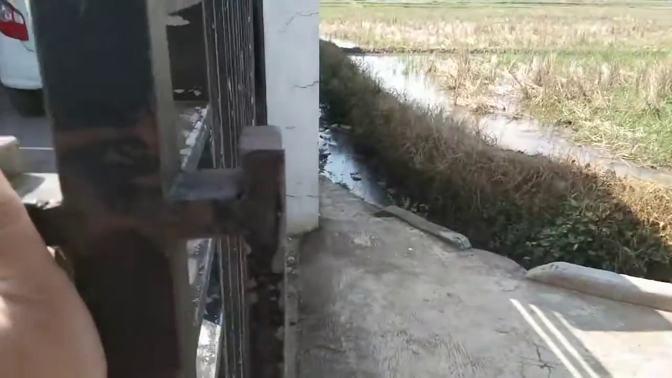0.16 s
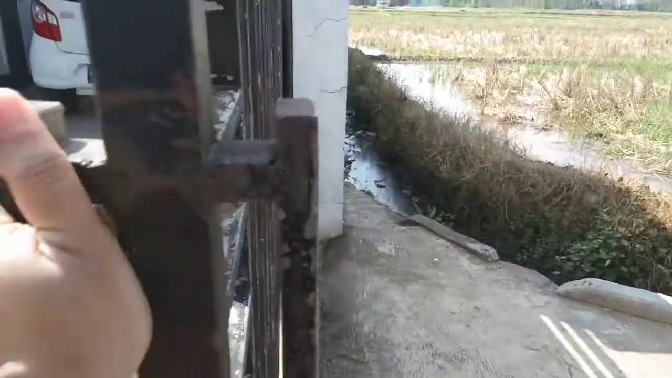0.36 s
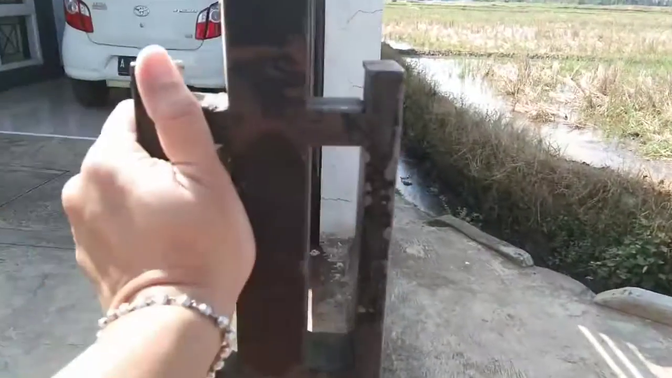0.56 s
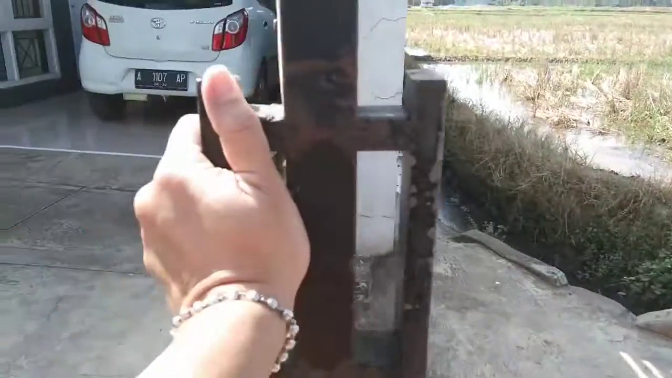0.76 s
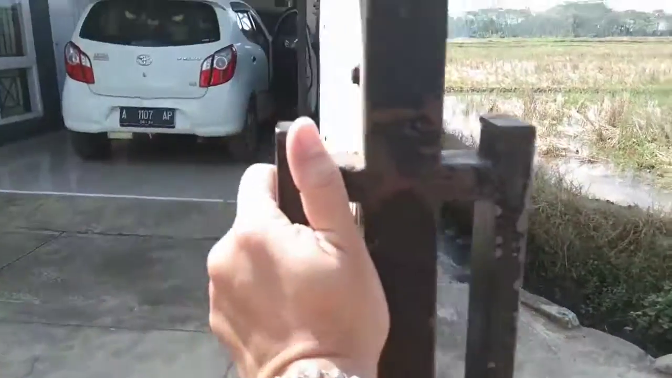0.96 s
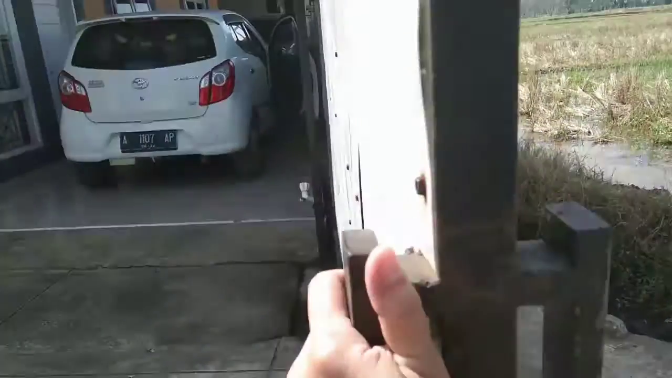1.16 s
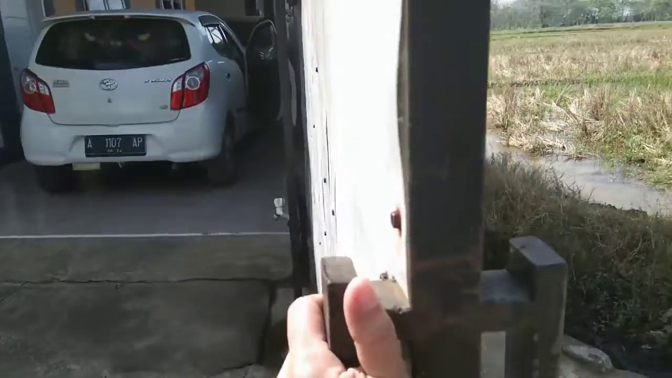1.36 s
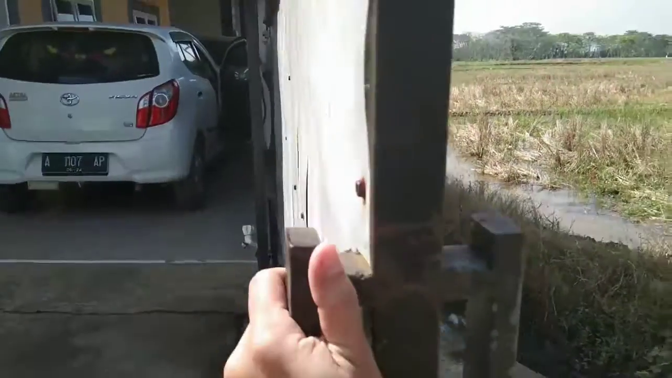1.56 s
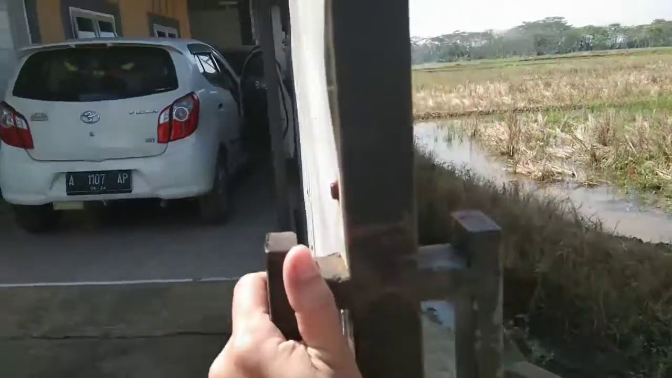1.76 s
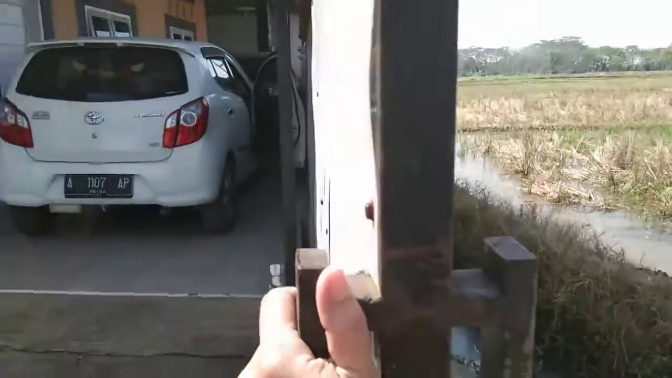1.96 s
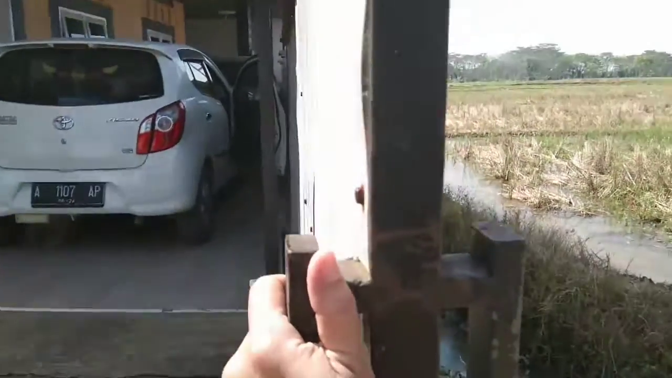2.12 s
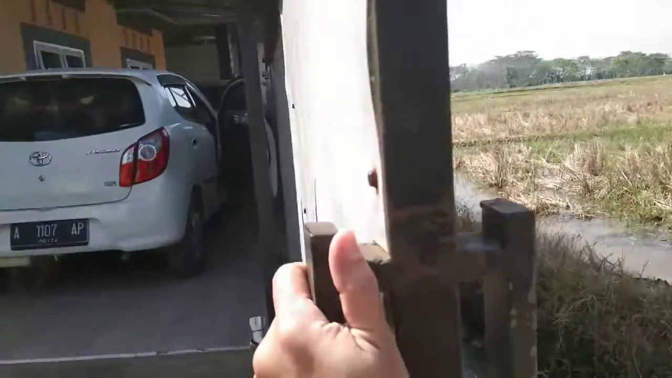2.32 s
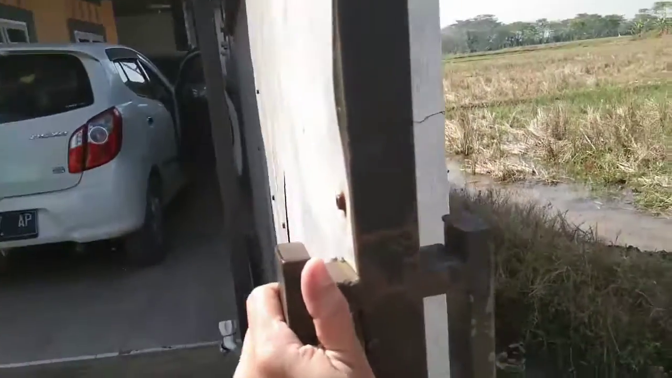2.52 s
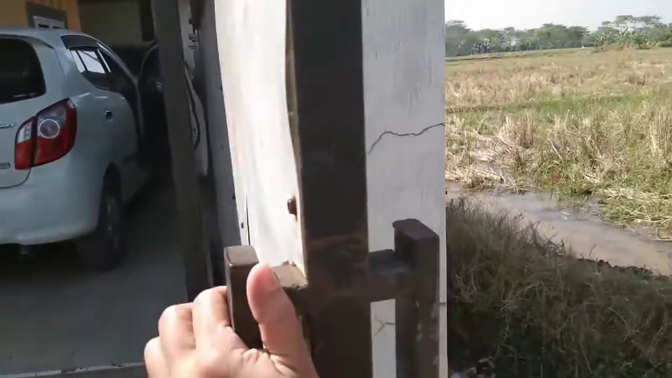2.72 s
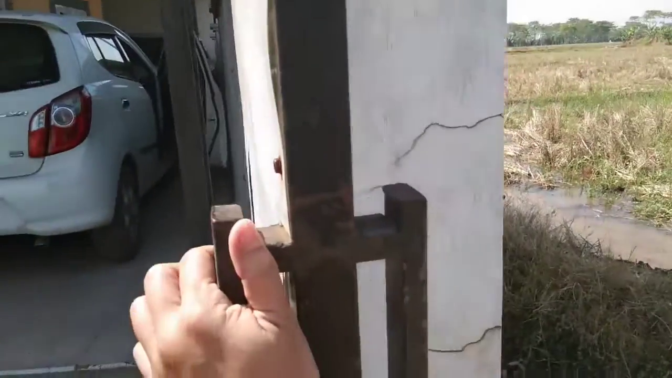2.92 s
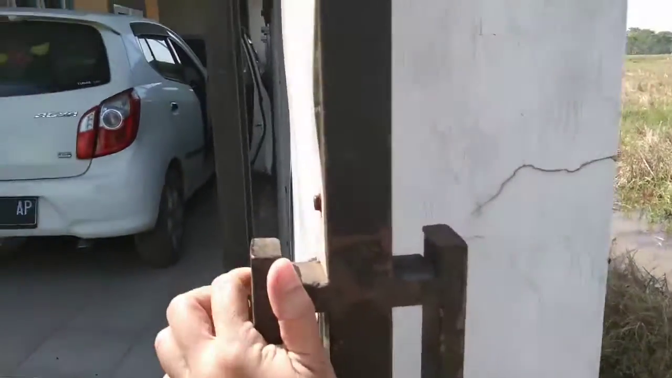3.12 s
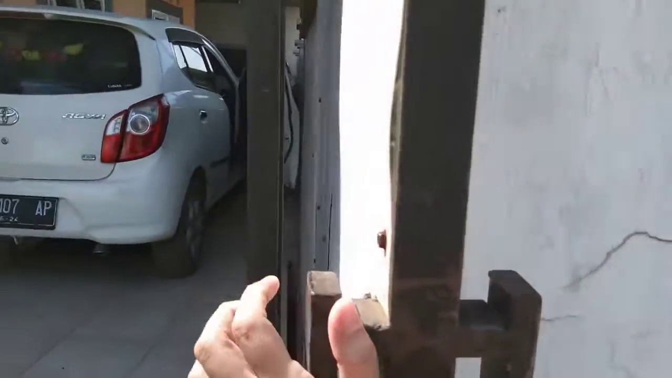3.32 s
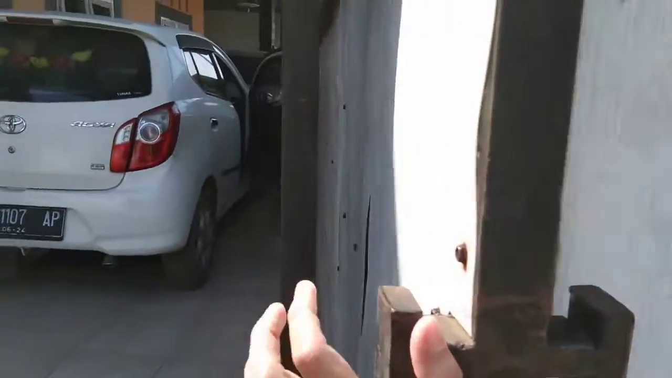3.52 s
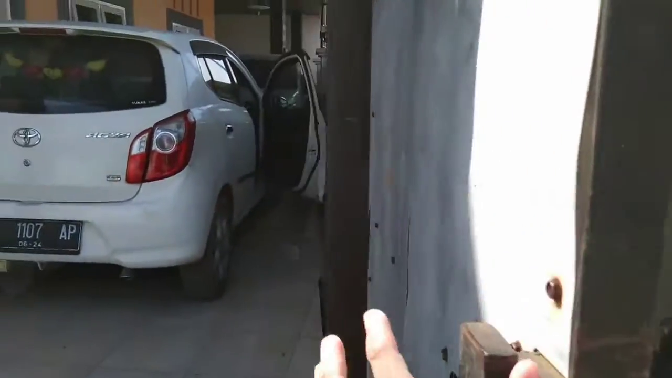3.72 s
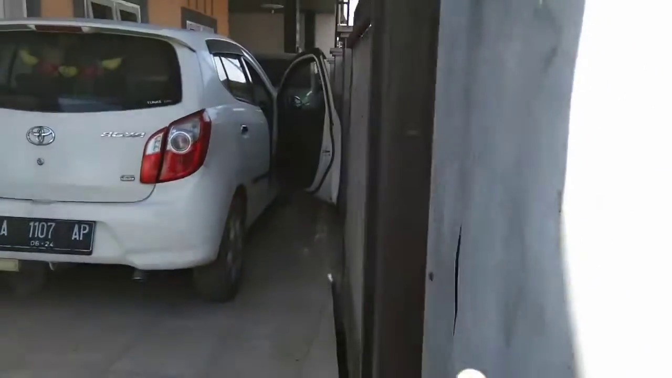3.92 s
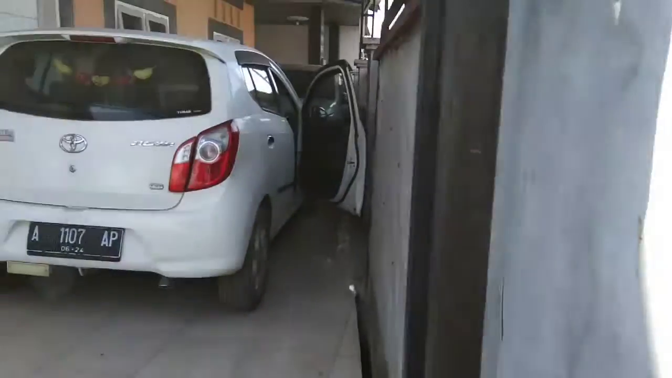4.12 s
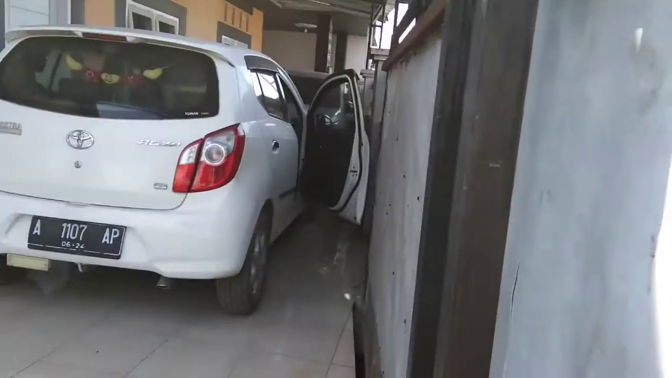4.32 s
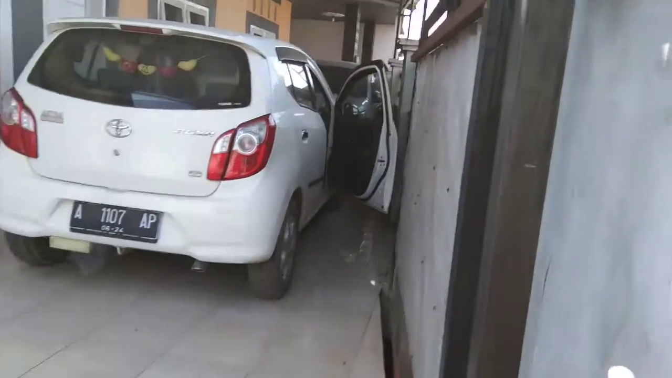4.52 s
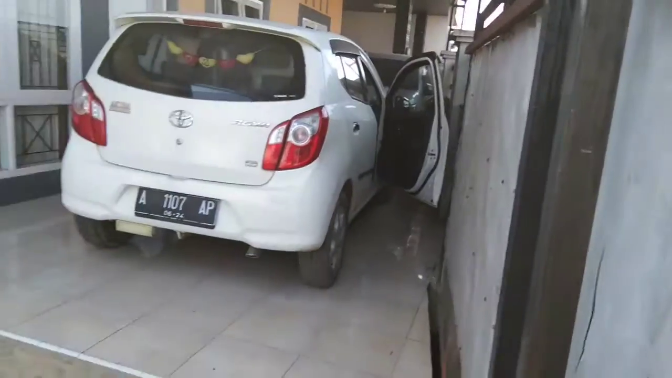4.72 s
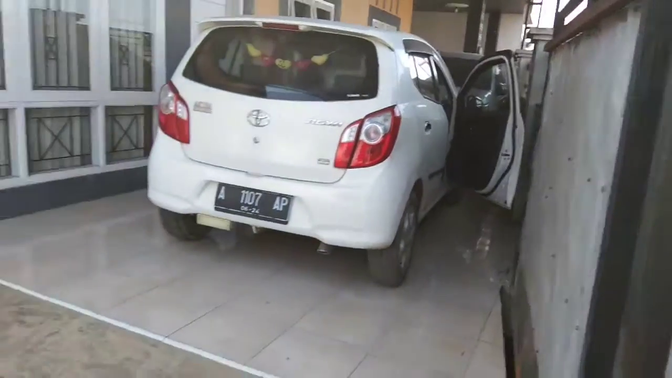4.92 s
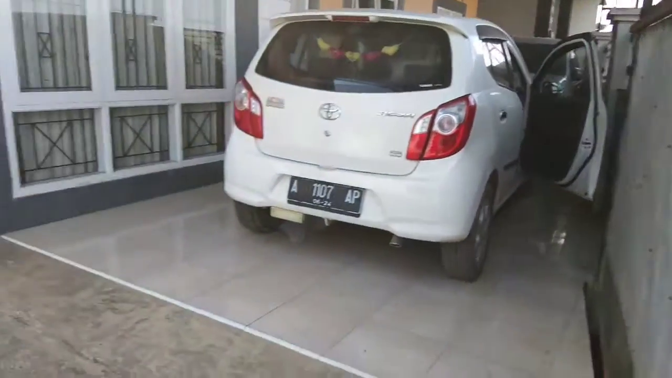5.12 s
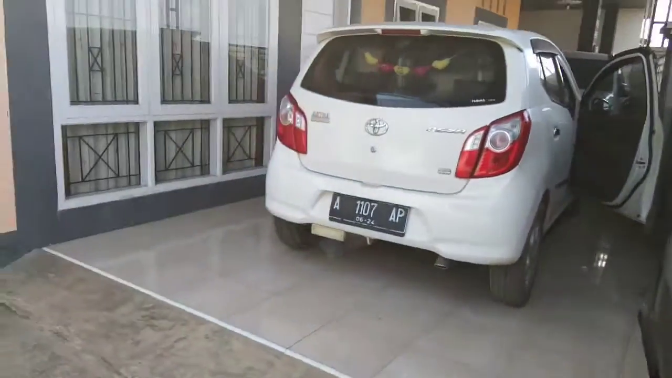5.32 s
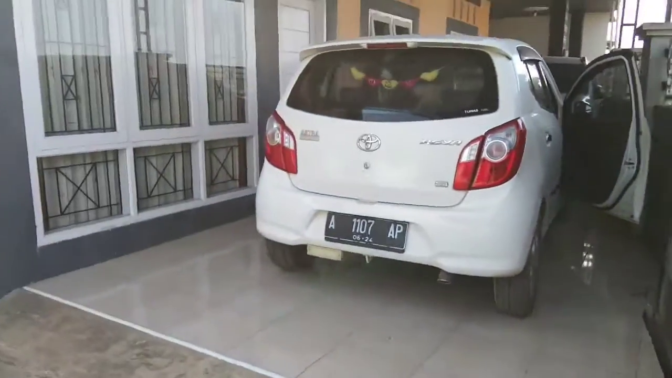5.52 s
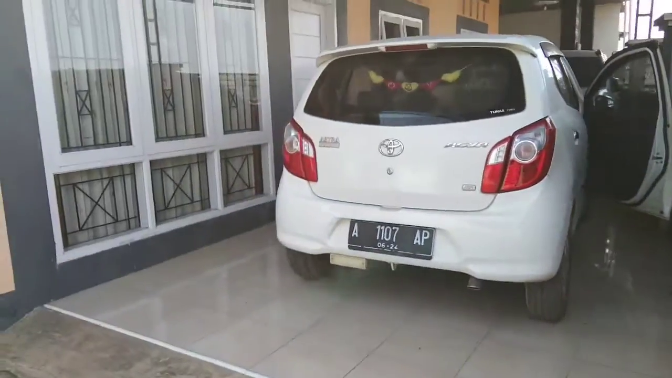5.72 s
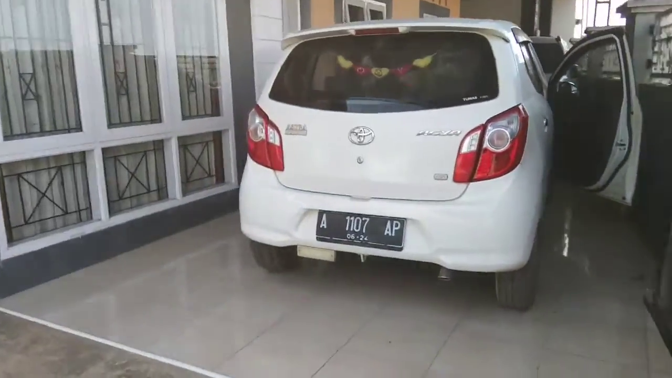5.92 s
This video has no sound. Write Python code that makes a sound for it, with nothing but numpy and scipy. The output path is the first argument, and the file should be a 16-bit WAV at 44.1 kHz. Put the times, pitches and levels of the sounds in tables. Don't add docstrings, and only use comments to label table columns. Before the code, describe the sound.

A close phone microphone outdoors by a house porch. At first there is low open-air murmur and a far motor, with tiny latch ticks and a thin creak jumping up in pitch around 0.25 s. At 0.43 s the gate jolts with a clank and bursts into loud, rough squealing, around 1.4 and 1.9 kHz, rich in biting overtones. Gritty grinding, ringing bars and airy hiss run beneath. A soft panel rattle comes near 0.9 s, fresh screeches from 1.25 to 1.7 s, a jolt at 1.85 s and a bright tick near 2 s. Broken squeals continue to 2.7 s, then mostly scraping and rumble with ticks near 3.1 s. A last strong screech and rattle come at 3.5 to 3.9 s. From 4.1 s the gate coasts, fading by 4.7 s. Dull footfalls follow at 4.85 and 5.3 s over faint insects and distant motor; a tiny tick ends it at 5.93 s.

```python
import sys
import numpy as np
from scipy import signal
from scipy.fft import rfft, irfft, next_fast_len
from scipy.io import wavfile
from scipy.ndimage import uniform_filter1d, minimum_filter1d

SR = 44100
rng = np.random.default_rng(int(sys.argv[2]) if len(sys.argv) > 2 else 0)


def elevation(decibels):
    levels = np.asarray(decibels, float)
    return 10 ** (levels / 20)


def int16_out(signal):
    q = np.round(np.clip(np.atleast_2d(signal).T, -1, 1) * 32767)
    wavfile.write(sys.argv[1], SR, q.astype(np.int16))


N = 267731
T = np.arange(N) / SR

# t/s, pressure on the bearing/dB, rolling of the gate/dB
PUSH = [(.2, -58.5, -46), (.26, -43.5, -44.5), (.36, -50, -48), (.5, -32, -42.5), (.86, -36, -32.5),
        (.96, -33, -35), (1.33, -30.5, -35), (1.76, -38.5, -43), (1.86, -34, -40), (2.4, -29, -35.5),
        (2.77, -37.5, -40), (3.1, -30, -32.5), (3.3, -32.5, -30.5), (3.56, -28, -32.5), (3.8, -39.5, -35),
        (3.98, -33, -33), (4.36, -50, -43.5), (4.75, -74, -58)]


def locks(table, grow_db_s, die_db_s, idle_db, idle_hz):
    bite_slope, idle_bite_db = 1.75, -17
    bite_onset, bite_fade = 2.1, 1
    t = T[::64]
    s, hold, db, hz, bite = np.transpose(table)[..., None]
    before = grow_db_s * np.clip(s - t, 0, None)
    after = die_db_s * np.clip(t - s - hold, 0, None)
    power = elevation(2 * (db - before - after))
    idle_db = idle_db[::64]
    idle_power = elevation(2 * idle_db)
    total = power.sum(axis=0) + idle_power
    pitch = ((power * hz).sum(axis=0) + idle_power * idle_hz) / total
    lock_over_db = bite_slope * db + bite - bite_onset * before - bite_fade * after
    over_db = power_sum(*lock_over_db, bite_slope * idle_db + idle_bite_db)
    return [np.interp(T, t, c) for c in (pitch, 10 * np.log10(total), over_db)]


def upper_locks(push_db):
    # t/s, hold/s, level/dB, f/Hz, bite of the slip/dB
    upper_table = [(.432, 0.033, -6, 1858, -16.5), (.515, 0.012, -17, 1885, -28),
                   (1.04, 0.0065, -23, 1865, -4.5), (1.17, 0.044, -16, 1862, -43),
                   (1.24, 0.037, -13, 1853, -36), (1.36, 0.028, -5.5, 1860, -20),
                   (1.41, 0.043, -11, 1935, -12.5), (1.545, 0.031, -17, 1915, -8.5),
                   (1.6, 0.047, -20.5, 1900, -12), (1.915, 0.018, -19, 1885, -2.5),
                   (1.95, 0.019, -9, 1894, -8), (2.01, 0.0084, -11.5, 1885, -12.5),
                   (2.087, .01, -15, 1850, -10), (2.147, 0.0072, -14.5, 1890, -17),
                   (2.19, 0.11, -23, 1895, -18), (2.32, 0.031, -17, 1910, -9.5),
                   (2.38, 0.056, -12.5, 1913, -16), (2.48, 0.043, -23.5, 1905, -26),
                   (2.69, 0.013, -19, 1894, -24), (3.11, 0.051, -25.5, 1850, -18.5),
                   (3.44, 0.015, -16.5, 1851, -17), (3.575, 0.055, -6, 1850, -20),
                   (3.72, 0.19, -19.5, 1856, -17.5), (3.885, 0.023, -11, 1852, -17)]
    return locks(upper_table, grow_db_s=419, die_db_s=218.5, idle_db=push_db - 1.5, idle_hz=1885)


def lower_locks(push_db):
    # t/s, hold/s, level/dB, f/Hz, bite of the slip/dB
    lower_table = [(.35, .06, -22.5, 1390, -6), (.46, 0.022, -36, 1385, -4), (.54, .13, -19, 1388, 4.5),
                   (.69, 0.058, -21.5, 1407, 7), (.76, 0.068, -21.5, 1384, 0),
                   (.86, 0.078, -29.5, 1388, -6), (1.28, 0.038, -11.5, 1398, -6),
                   (1.37, 0.0086, -17.5, 1383, -8.5), (1.43, 0.057, -36.5, 1380, -12),
                   (1.56, 0.049, -32, 1380, -10), (1.84, .02, -26.5, 1378, -16),
                   (2.11, 0.061, -23, 1386, -6.5), (2.2, 0.061, -18, 1389, -6.5),
                   (2.3, 0.098, -23.5, 1380, 3), (2.47, 0.05, -19.5, 1398, 2), (2.55, .09, -24.5, 1387, 2),
                   (2.92, 0.15, -28.5, 1400, -3), (3.52, 0.053, -26, 1408, -19)]
    return locks(lower_table, grow_db_s=295.5, die_db_s=162, idle_db=push_db - 11.5, idle_hz=1400)


def squeal(hz, db, over_db, rough, orders, wobble_hz):
    turn = np.exp(2j * np.pi * np.cumsum(hz * (1 + .003 * walk(100))) / SR)
    skirts = .5 * (walk(3 * wobble_hz) + 1j * walk(3 * wobble_hz))
    over = elevation(over_db)
    partials = [(0.97, elevation(db))] + [(k, over * elevation(d)) for k, d in orders]
    out = 0
    for k, gain in partials:
        lost = 1 - (1 - rough) ** k
        smear = .87 * (walk(wobble_hz * k) + 1j * walk(wobble_hz * k)) + skirts
        phasor = np.sqrt(2 - 2 * lost) + np.sqrt(lost) * smear
        out = out + gain * (phasor * turn ** k).real
    return out


def creak():
    # t/s, f/Hz, level/dB
    start = [
        (.07, 1000, -62),
        (.12, 1035, -57),
        (.2, 1050, -46.5),
        (.24, 1065, -54),
        (.265, 1205, -34),
        (.3, 1204, -41),
        (.36, 1230, -45),
        (.42, 1210, -50),
    ]
    gate, (hz, db) = columns(start)
    return gate * squeal(hz, db, db, 0.4, [], 57.0)


def squeals(high, low):
    # t/s, upper roughness/0-1, lower roughness/0-1
    grip = [(0, .1, .08), (.43, .15, .08), (.5, .2, .2), (.56, .5, .4), (.95, .7, .4), (1.15, .3, .6),
            (1.28, .35, .35), (1.36, .5, .2), (1.42, .6, .12), (1.7, .6, .2), (1.9, .6, .5),
            (2.07, .6, .12), (2.38, .4, .14), (2.6, .4, .15), (2.7, .6, .4), (3.4, .4, .5), (3.55, .18, .5),
            (4.2, .18, .5)]
    # multiple, level/dB
    upper_orders = [(2, 3.5), (3, 5.5), (4, 5.5), (5, -11.5), (6, -10.5), (7, -21), (8, -17)]
    # multiple, level/dB
    lower_orders = [(2, -1), (3, -16), (4, -8), (5, -6), (6, -12)]
    # f/Hz, width/Hz, level/dB
    strands = [(1250, 40, -10), (1385, 4.9, -11), (1427, 9.2, 0.5), (1787, 86, -21), (1853, 28, -14.5),
               (1982, 29, -20), (1935, 27, -2), (1986, 11, -4)]
    flutter_db, flutter_hz = 4, 110
    _, (high_rough, low_rough) = columns(grip)
    out = creak()
    hz, db, over_db = high
    beaded_db = db - 3.5 + flutter_db * high_rough * walk(flutter_hz)
    out += driven() * squeal(hz, beaded_db, over_db - 1, high_rough, upper_orders, 150.)
    hz, db, over_db = low
    beaded_db = db - 3.5 + flutter_db * low_rough * walk(flutter_hz)
    out += driven() * squeal(hz, beaded_db, over_db - 2, low_rough, lower_orders, 150.)
    return out + ring(out, strands)


def bar_scrape():
    # f/Hz, level/dB per Hz
    scrape = [(900, -23.5), (1250, -10), (1700, 3.5), (2200, -3.5), (2600, -8), (3070, -17), (3850, -15.5),
              (4200, -22.5), (5000, -23), (6500, -43)]
    # f/Hz, width/Hz, level/dB
    bar_modes = [(1240, 64, 1.5), (1377, 27, -22.5), (1560, 31, 7), (1710, 110, 7), (1550, 170, 36),
                 (1855, 13, -17.5), (1930, 17, -8.5), (1920, 20, -9.5)]
    grains = grit(3.0)
    ringing = unit(cut(ring(grains, bar_modes), 770, "high"))
    return colour(grains, scrape, lo_hz=2040, hi_hz=2530) + elevation(-32.5) * driven() * ringing


def frame_rumble(roll_db):
    # f/Hz, level/dB per Hz
    rumble = [(18, -54), (30, -51), (113, -5.5), (184, -11.5), (252, -2), (314, -5.5), (620, -9.5),
              (1300, -9), (1690, -57), (2860, -120)]
    # f/Hz, width/Hz, level/dB
    frame_modes = [(122, 48, -7), (182, 21, -9), (241, 17, -8), (395, 26, 0), (477, 13, 3)]
    rolling = colour(grit(2.46), rumble, lo_hz=150, hi_hz=1000)
    ring_db = -10.0 + 0.2 * (roll_db + 34)
    return cut(rolling + elevation(ring_db) * unit(ring(grit(6.7), frame_modes)), 116, "high")


def grinding(high, low):
    # f/Hz, level/dB per Hz
    hiss_curve = [(2650, -9.5), (4500, -14.5), (5070, -11), (5930, -1), (6930, -1), (7900, -4), (9040, -21),
                  (11000, -16), (12600, -25.5), (14000, -23), (15600, -20)]
    # f/Hz, width/Hz, level/dB
    whistle_modes = [(9640, 100, 0), (13550, 130, -1), (14900, 250, -6)]
    gate, (push_db, roll_db) = columns(PUSH)
    scrape_db = power_sum(push_db, high[1] - 24) - 0.49 * reducer()
    rumble_db = roll_db - reducer()
    push_hiss_db = 1.22 * (push_db + 33) - 4.5 - 33
    hiss_db = power_sum(push_hiss_db, 0.81 * high[2] - 4.5, 0.81 * low[2] - 11)
    whistle_db = power_sum(push_db - 29, high[1] - 32)
    press = 1.1 * walk(24.94)
    spit = np.minimum(walk(200), 2)
    hiss = colour(grit(1.6), hiss_curve, lo_hz=5940, hi_hz=7240)
    whistle = unit(ring(ring(grit(1.3), whistle_modes), whistle_modes))
    ground = unit(ring(grit(0.99), [(71.4, 22, -9), (102, 24, -3)]))
    out = driven() * elevation(rumble_db - 13 + walk(4.1)) * ground
    out += elevation(scrape_db - 4.5 + press) * bar_scrape()
    out += elevation(rumble_db - 2.5 + 0.48 * press) * frame_rumble(roll_db)
    out += elevation(hiss_db - 2.18 + 0.59 * press + 0.63 * walk(70) + 1.8 * spit) * hiss
    out += elevation(whistle_db - 0.5 + 0.55 * press + 1.8 * spit) * whistle
    return gate * out


def clinks():
    # t/s, peak level/dB, ring share/0-1, decay/s
    ticks = [(.157, -36, 0, .006), (.213, -29, 0, .006), (.245, -20, .95, .035), (.25, -29, 0, .035),
             (1.024, -26, .5, .01), (1.553, -28, .1, .01), (1.971, -18, 0, .008), (2.828, -30, .2, .01),
             (3.125, -25, 0, .012), (3.25, -26, 0, .01), (5.929, -40, 0, .008)]
    # f/Hz, width/Hz, level/dB
    latch_modes = [(3750, 110, -3), (3900, 110, -7), (4120, 90, -1), (4240, 90, 0), (4430, 130, -9)]
    # f/Hz, width/Hz, level/dB
    crack_modes = [(7400, 1800, -4), (1500, 1500, -17), (11500, 4100, -16)]
    out = np.zeros(N + SR)
    t = np.arange(SR // 4) / SR
    for s, db, share, decay_s in ticks:
        chatter = rng.standard_normal(len(t))
        arms = unit(ring(ring(chatter, latch_modes), latch_modes))
        crack = unit(ring(ring(chatter, crack_modes), crack_modes))
        tick = share * arms + (1 - share) * crack
        envelope = np.exp(-t / decay_s) * (1 - np.exp(-t / .005))
        out[int(s * SR):][:len(t)] += elevation(db - 4) * tick * envelope
    return out[:N]


def clanks():
    # t/s, level/dB, length/s
    bumps = [
        (0.437, -25, 0.011),
        (0.93, -30.5, 0.058),
        (1.284, -42, 0.069),
        (1.843, -27.5, 0.027),
        (3.533, -26, 0.083),
    ]
    # f/Hz, width/Hz, level/dB
    panel_modes = [(1123, 37, 2.5), (1200, 64, -1), (1490, 70, 10), (1670, 76, 9), (2400, 50, -18)]
    shake = sum(elevation(db) * np.exp(-((T - s) / length) ** 2) for s, db, length in bumps)
    return shake * unit(ring(grit(4.8), panel_modes))


def porch(gate):
    t = np.arange(SR // 2) / SR
    tail = rng.standard_normal(len(t)) * elevation(-60 * t / 0.25) * (t > .004)
    return signal.fftconvolve(gate, tail / np.sqrt(np.sum(tail ** 2)))[:N]


def thumps():
    # t/s, peak level/dB
    steps = [
        (4.842, -33),
        (4.878, -29),
        (5.268, -31),
        (5.288, -31),
        (5.31, -33),
        (3.045, -32),
        (1.98, -35),
    ]
    out = 0
    for s, db in steps:
        wave = np.sin(2 * np.pi * (rng.uniform(80, 160) * T + rng.random()))
        out = out + elevation(db) * np.exp(-((T - s) / .008) ** 2) * wave
    return out


def field():
    # f/Hz, level/dB per Hz
    murmur = [(15, -49), (25, -22), (70, 7.5), (184, 2), (254, -18), (315, -1.5), (446, -13), (600, -13.5),
              (745, -2), (1000, -19), (1630, -18), (3460, -30), (7350, -20), (9120, -41), (15600, -43.5)]
    # f/Hz, width/Hz, level/dB
    motor_modes = [(75.8, 1.5, -53), (105.4, 6.5, -55.5), (180.5, 6, -48.5), (197.2, 10, -54),
                   (239.7, 9.3, -54.5), (300.6, 6.8, -54.5), (616, 17, -56.5), (764, 17, -54),
                   (879, 46, -57)]
    # start, full, full, end of the dip t/s
    moving_s = (.45, .55, 3.9, 4.45)
    low_db = -45 - 4.5 * (T < 1) - 18.5 * np.interp(T, moving_s, [0, 1, 1, 0])
    early_db = -7 * np.clip(1 - T / 16.5, 0, 1)
    high_db = -42.5 + early_db + 1.8 * np.clip(T - 4.6, 0, None)
    air = colour(rng.standard_normal(N), murmur)
    motor = 0
    for f, w, db in motor_modes:
        motor = motor + elevation(db + 44.0) * unit(ring(rng.standard_normal(N), [(f, w, 0)]))
    insects = unit(ring(rng.standard_normal(N), [(2260, 570, 0)]))
    lows = unit(cut(air, 1190, "low")) + motor
    highs = unit(cut(air, 1010, "high")) + elevation(-5.5) * insects
    return elevation(low_db + .5 * walk(3.24)) * lows + elevation(high_db + 0.5 * walk(4.55)) * highs


def reducer():
    # t/s, length/s, depth/dB
    cuts = [
        (0.502, 0.418, 10.5),
        (1.438, 0.27, 10.5),
        (2.016, 0.581, 10),
        (3.615, 0.32, 12),
    ]
    edge_s = 0.043
    depth = 0
    for s, length, db in cuts:
        depth = depth + db * np.clip(np.minimum(T - s, s + length - T) / edge_s + .5, 0, 1)
    return depth


def driven():
    return np.clip((4.12 - T) / 0.062, 0, 1)


def grit(scatter_db):
    return unit(rng.standard_normal(N) * elevation(scatter_db * np.minimum(rng.exponential(size=N), 6)))


def ring(x, modes):
    return sum(elevation(db) * signal.lfilter(*signal.iirpeak(f, f / w, SR), x) for f, w, db in modes)


def colour(x, points, lo_hz=0, hi_hz=2e4):
    size = next_fast_len(N, True)
    hz = np.arange(size // 2 + 1) * SR / size + 1e-3
    f, db = np.transpose(points)
    spec = rfft(x, size) * elevation(np.interp(np.log(hz), np.log(f), db, left=-90, right=-90))
    inside = irfft(spec * (hz > lo_hz) * (hz < hi_hz), size)
    return irfft(spec, size)[:N] / np.std(inside)


def cut(x, edge_hz, kind):
    return signal.sosfilt(signal.butter(6, edge_hz, kind, fs=SR, output="sos"), x)


def walk(rate):
    levels = rng.standard_normal(int(N * rate / SR) + 2)
    return np.sqrt(3 / 2) * np.interp(np.arange(N) * rate / SR, np.arange(len(levels)), levels)


def power_sum(*dbs):
    return 10 * np.log10(sum(10 ** (db / 10) for db in dbs))


def unit(x):
    return x / np.sqrt(np.mean(np.abs(x) ** 2))


def columns(table, fade_s=0.029):
    s, *cols = np.transpose(table)
    gate = np.clip(np.minimum(T - s[0], s[-1] - T) / fade_s, 0, 1)
    return gate, [np.interp(T, s, c) for c in cols]


def scene():
    _, (push_db, _) = columns(PUSH)
    high = upper_locks(push_db)
    low = lower_locks(push_db)
    gate = squeals(high, low) + grinding(high, low) + clinks() + clanks()
    return (gate + elevation(-12.5) * porch(gate) + thumps() + field())[None]


def top_cut(x):
    return signal.sosfilt(signal.butter(12, 15780, fs=SR, output="sos"), x)


def record(dry):
    dry = signal.sosfilt(signal.butter(1, 45, "high", fs=SR, output="sos"), dry)
    peak = -minimum_filter1d(-np.abs(dry), SR // 400)
    hold = uniform_filter1d(peak, SR // 150, origin=SR // 400)
    gain = np.minimum(1, (.44 / (hold + 1e-9)) ** .8)
    return top_cut(cut(dry * gain, 16000, "low"))


dry = scene()
out = record(dry)
int16_out(out)
```